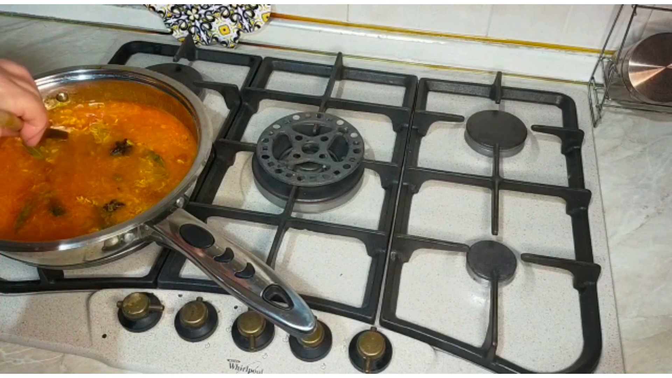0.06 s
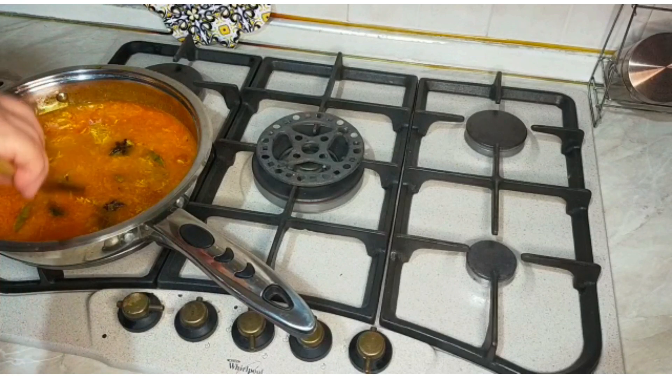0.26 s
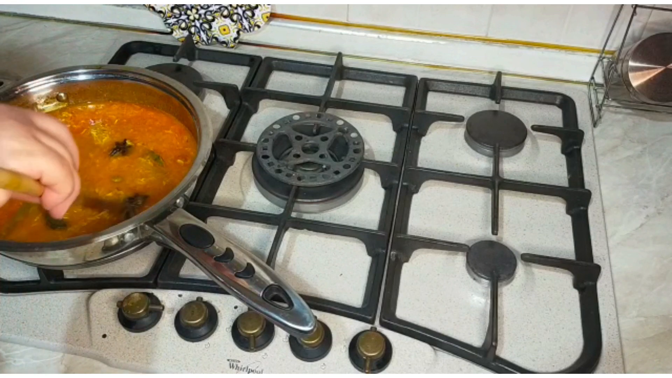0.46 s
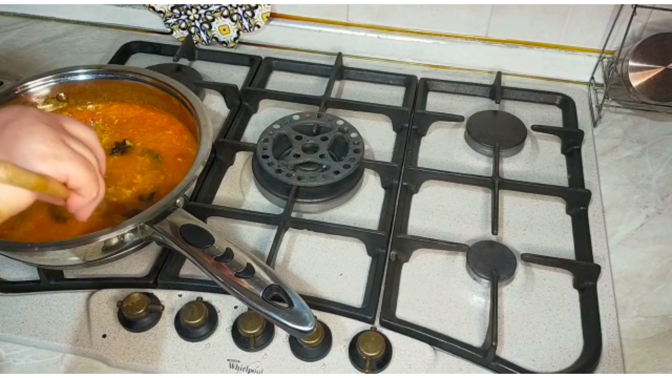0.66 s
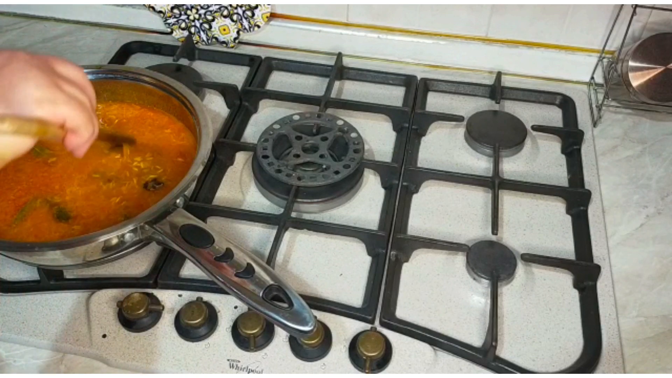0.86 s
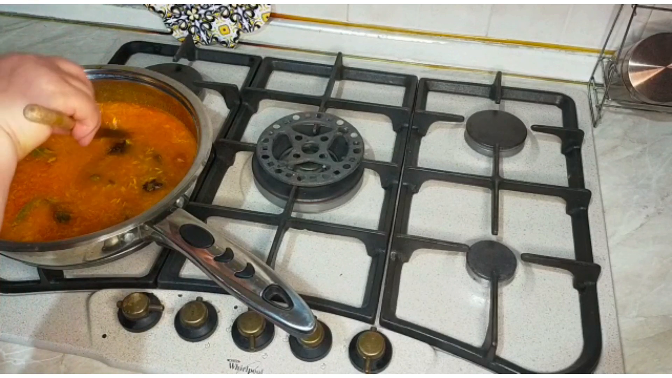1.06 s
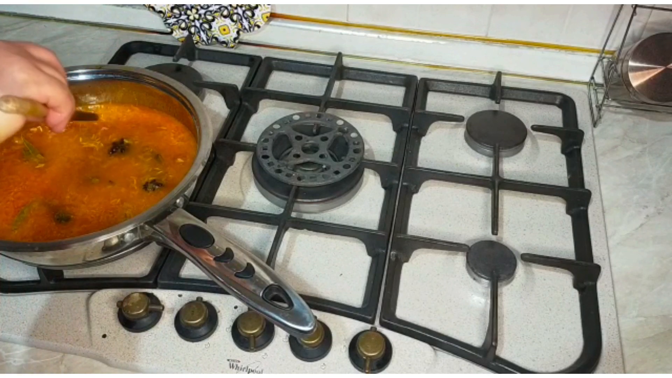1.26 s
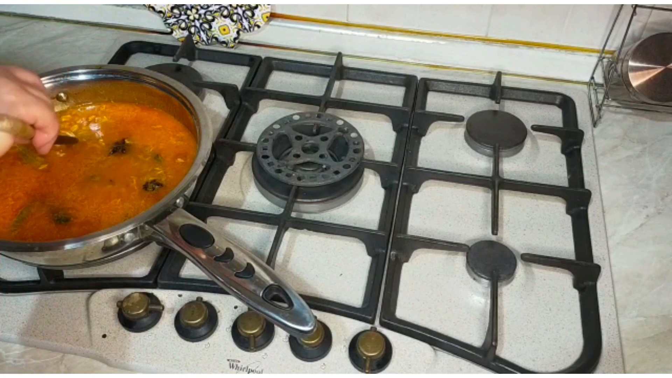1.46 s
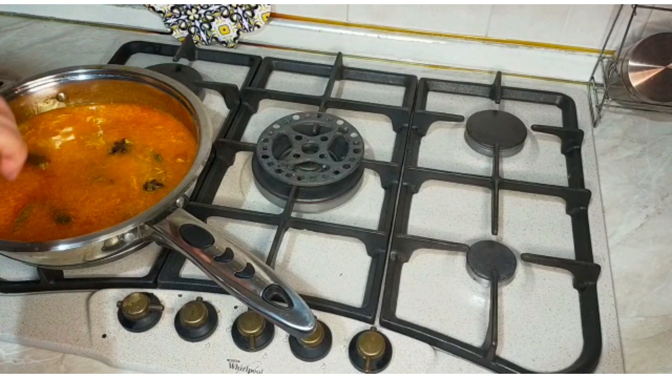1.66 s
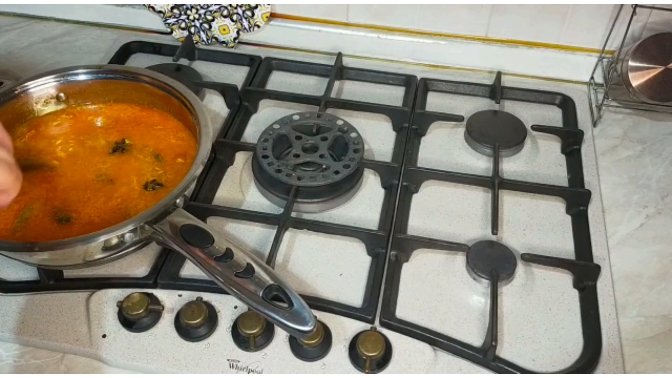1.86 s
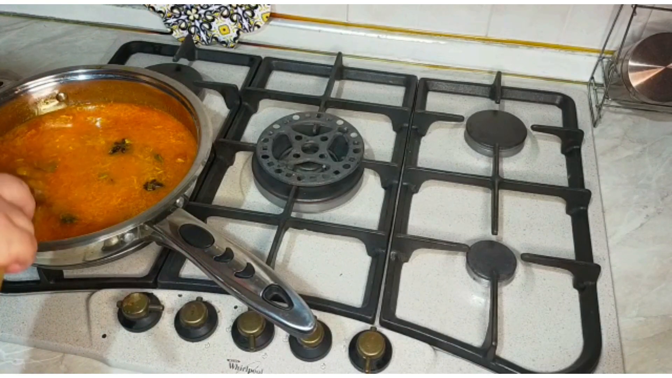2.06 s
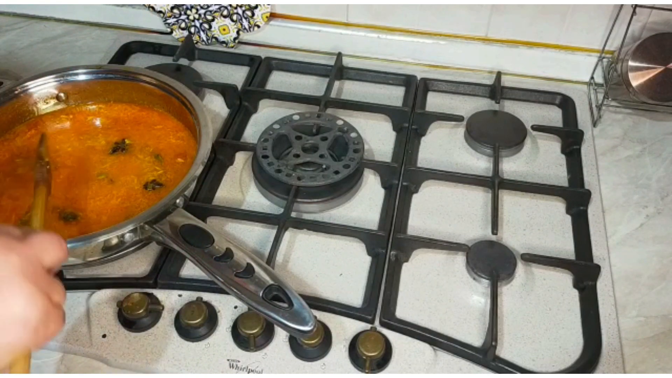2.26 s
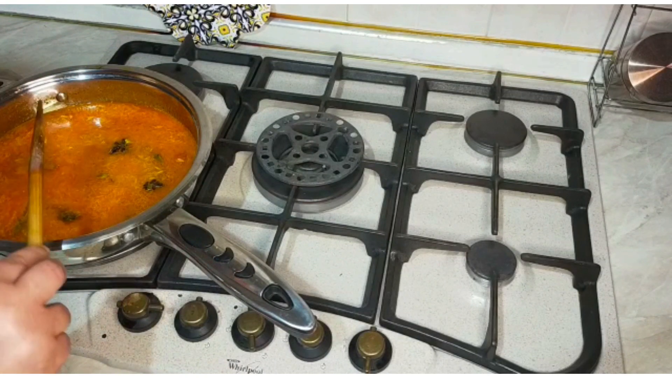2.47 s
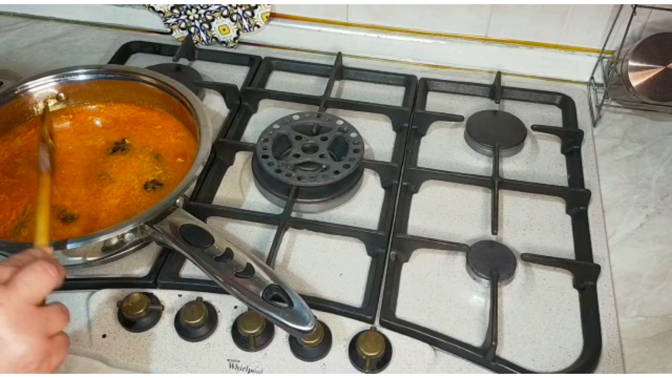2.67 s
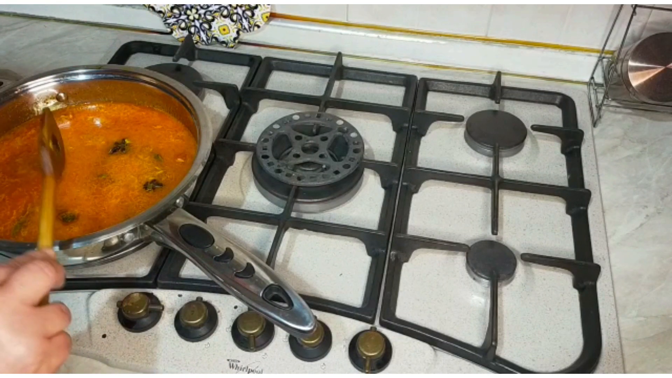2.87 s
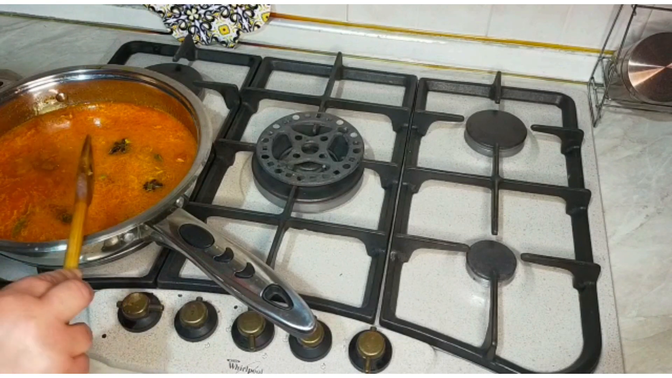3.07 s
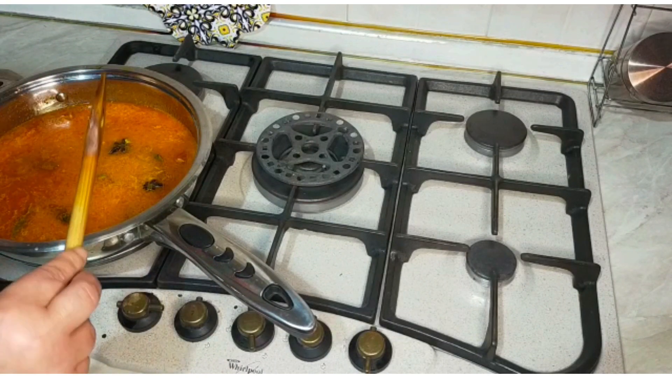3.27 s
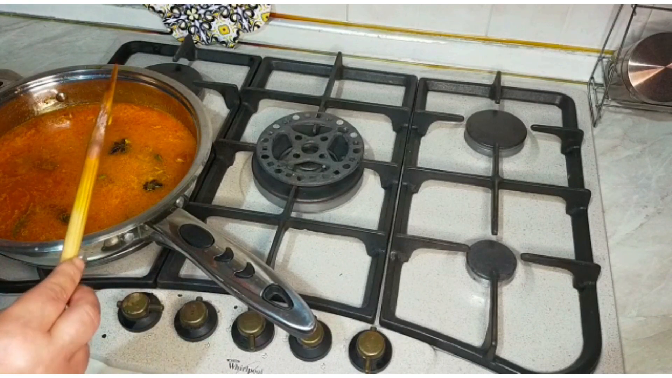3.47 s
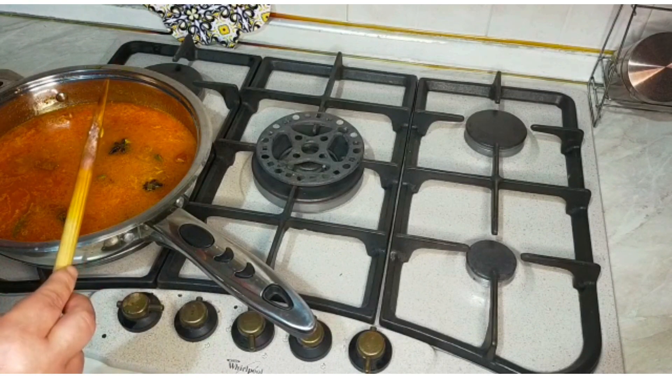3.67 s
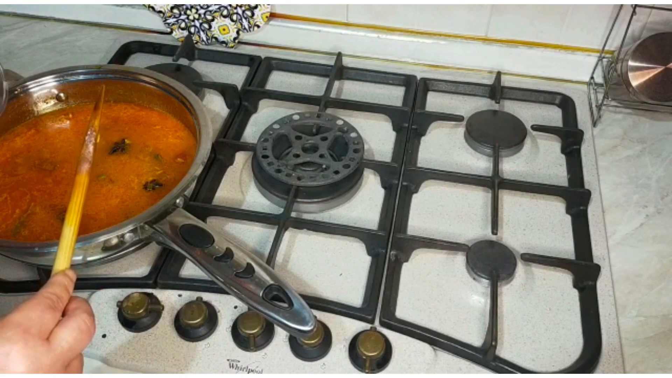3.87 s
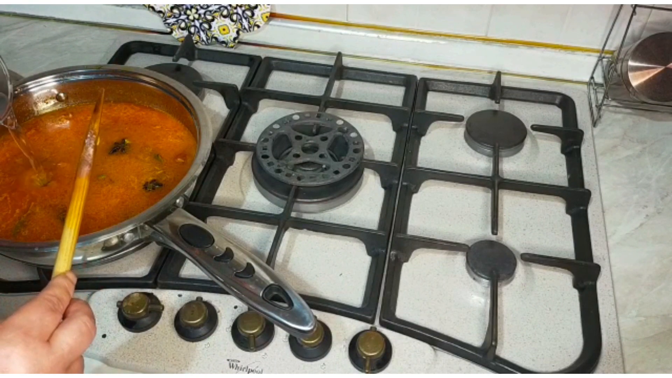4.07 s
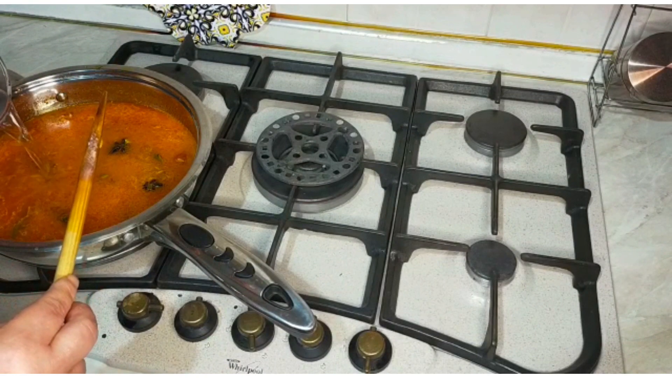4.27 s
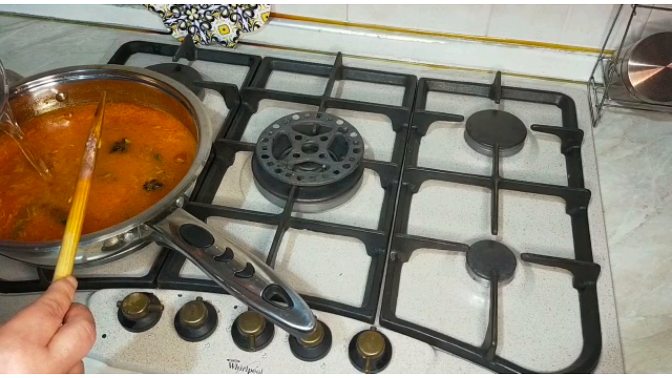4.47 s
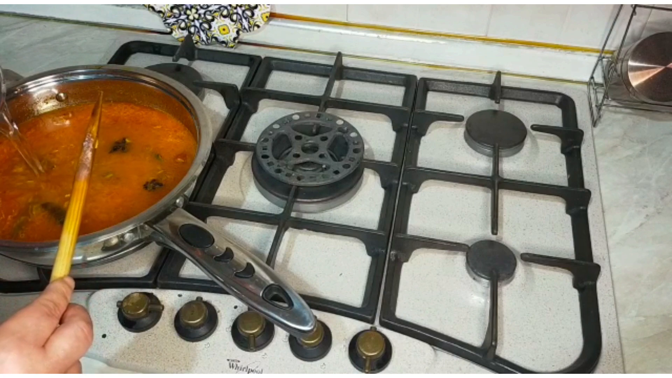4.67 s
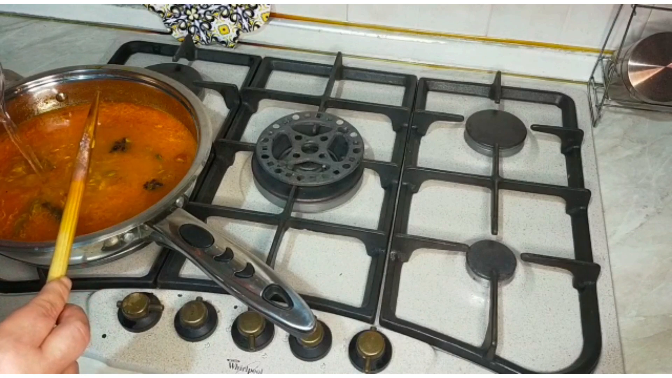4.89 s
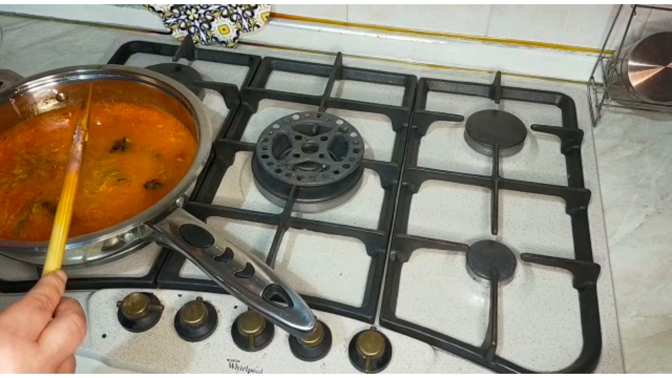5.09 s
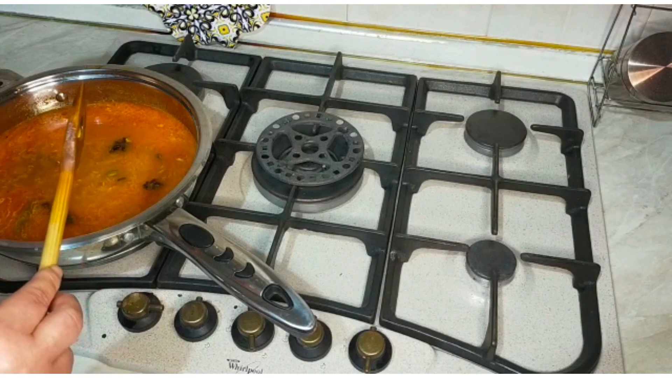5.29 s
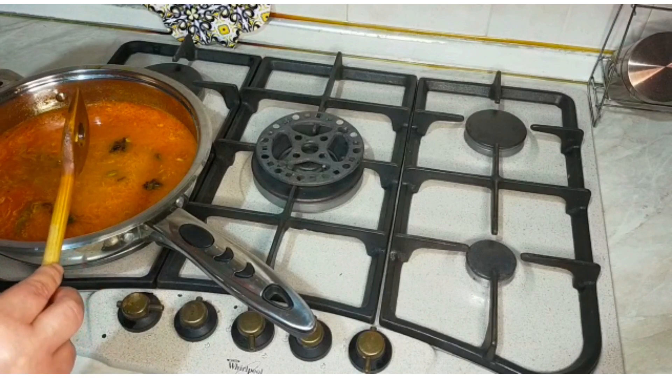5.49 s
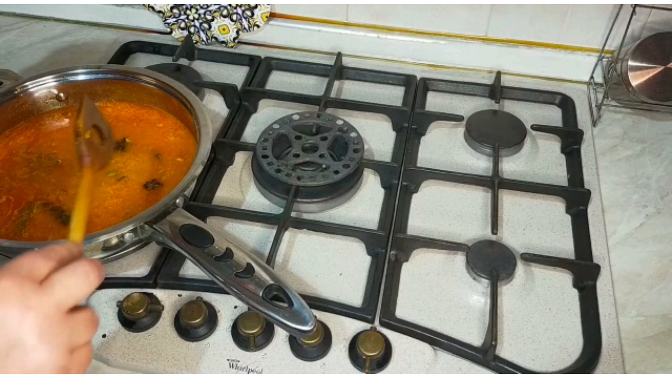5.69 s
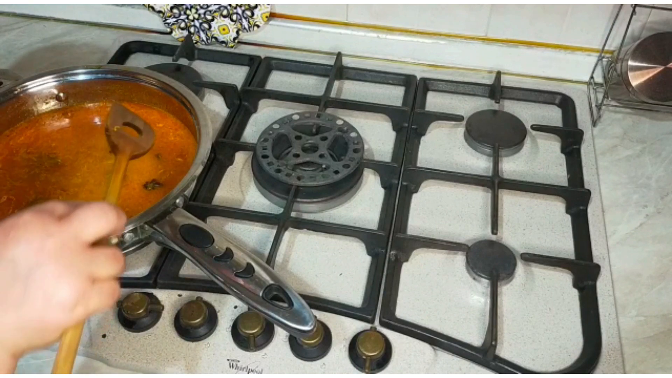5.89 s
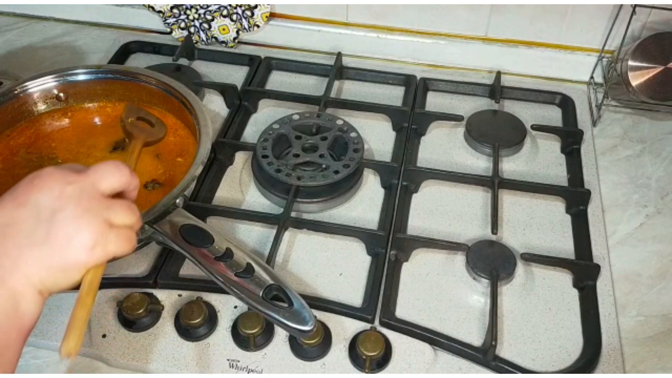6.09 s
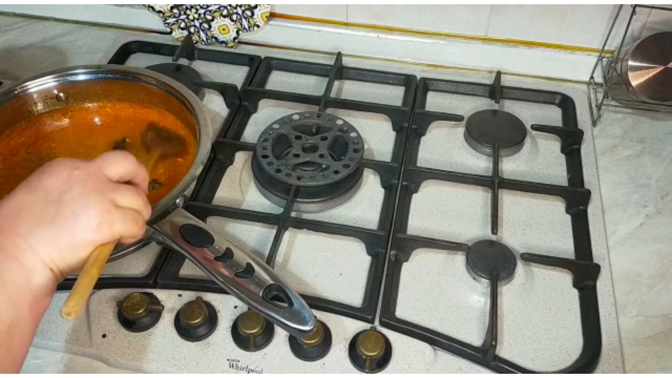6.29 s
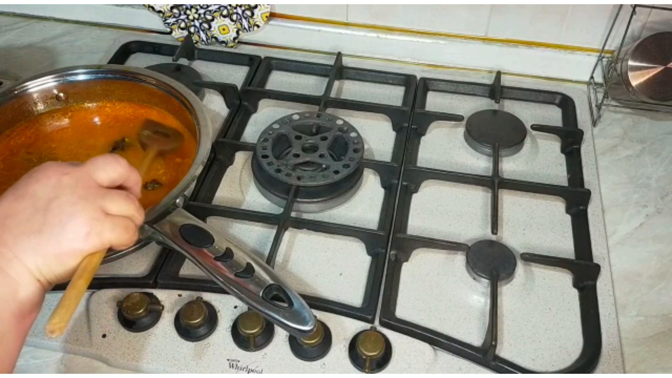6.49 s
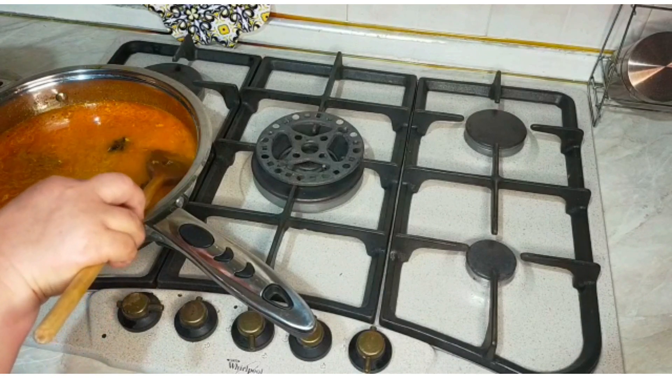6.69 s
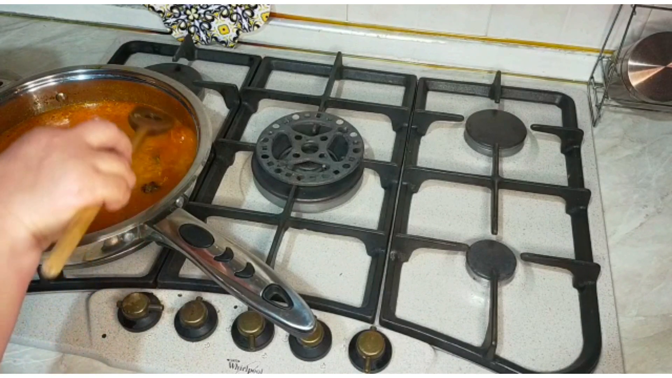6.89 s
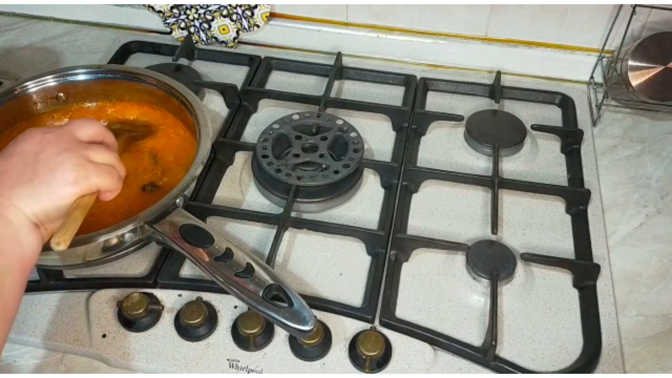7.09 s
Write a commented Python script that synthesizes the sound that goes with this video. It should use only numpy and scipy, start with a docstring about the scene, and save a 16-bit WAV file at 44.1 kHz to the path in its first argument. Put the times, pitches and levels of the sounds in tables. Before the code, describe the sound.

Close mono sound of a pan of sauce simmering on a gas ring in a small hard-surfaced kitchen. After a near-silent start, three quick wood-on-steel blows ring and rattle the pan, and a weaker, darker one follows. The ring dies within about half a second. Low hiss and hum remain; sauce wells up with plops, fizzing spits and a tiny metallic tick, then a faint stirring slosh and closing bubble.

```python
"""A pan of sauce simmers on a hissing gas ring in a tiled kitchen: shaped noise, tiny decaying tones, mains hum.
Near the start the sauce plops and sloshes. The spoon then knocks the rim three times and is laid across it;
noise cracks and clatter, decaying steel modes and a hob boom make each blow.
Unstirred, the sauce wells up, plops, spits and sizzles in damped noise bursts; the resting spoon slips, ticking.
Last, the spoon dips back in: a dull bump and slosh, then one more plop."""
import sys
import numpy as np
from scipy import signal
from scipy.fft import rfft, irfft, next_fast_len
from scipy.io import wavfile

SR = 44100
rng = np.random.default_rng(int(sys.argv[2]) if len(sys.argv) > 2 else 0)


def dump(signal):
    """Clip the signal to [-1, 1] and save it as 16-bit WAV at the path in sys.argv[1]."""
    limited = np.clip(np.atleast_2d(signal).T, -1, 1)
    pcm = np.round(limited * 32767).astype(np.int16)
    wavfile.write(sys.argv[1], SR, pcm)


N = 315182
TIME = np.arange(N) / SR

# crowded short modes of spoon, pan and grate: (frequency [Hz], relative density [dB per Hz])
CLATTER_COLOUR = [(40, -8), (100, 1.5), (190, -9.5), (280, -4), (600, -2), (880, -8.5), (1250, -1.5),
                  (1750, -4.5), (2350, 1.5), (3200, -9), (4700, -16), (6200, -8.5), (7900, -9.5),
                  (9400, -20.5), (12000, -19.5), (14700, -9), (16000, -19)]
# clatter decay in the kitchen: (frequency [Hz], t60 [s])
CLATTER_DECAY = [(60, 0.75), (300, 0.41), (1000, 0.46), (2500, 0.4), (6000, 0.3), (10000, 0.32),
                 (15000, 0.27)]


def from_db(db):
    """Decibels to amplitude gain."""
    return 10 ** (np.asarray(db) / 20)


def rms_one(x):
    """Scale to unit power."""
    return x / np.sqrt(np.mean(x ** 2) + 1e-20)


def at_hz(points, hz):
    """Interpolate a table on a log-frequency axis."""
    table = np.array(points)
    return np.interp(np.log(np.maximum(hz, 1)), np.log(table[:, 0]), table[:, 1])


def fade(t, t60):
    """Exponential decay, 60 dB in t60 seconds."""
    return np.exp(-np.log(1000) * t / t60)


def add(out, start_s, sound):
    """Mix a sound in at start_s."""
    start = max(round(start_s * SR), 0)
    out[start:start + len(sound)] += sound[:N - start]


def noise(gain_at, size):
    """Unit-power noise coloured by a function of frequency."""
    padded = next_fast_len(size)
    hz = np.fft.rfftfreq(padded, 1 / SR)
    spectrum = rfft(rng.standard_normal(padded)) * gain_at(hz)
    return rms_one(irfft(spectrum, padded)[:size])


def band(centre_hz, octaves):
    """Colour of a broad resonance."""
    return lambda hz: 1 / np.sqrt(1 + (2 * np.log2((hz + 1) / centre_hz) / octaves) ** 6)


def tilt(hz, db_per_octave, corner_hz=3800):
    """Treble slope above a corner; a softer contact has a more negative one."""
    return from_db(db_per_octave * np.log2(1 + (hz / corner_hz) ** 2) / 2)


def swell(crest_s, half_s, calm_db, crest_db):
    """Gain rising from a calm level to one rounded crest and sinking back."""
    return from_db(calm_db + (crest_db - calm_db) * np.exp(-((TIME - crest_s) / half_s) ** 2))


def pop(hz, octaves, t60, room_db=-9.0, room_t60=0.39):
    """Damped noise burst with a diffuse echo off the tiles; a very short one feeds the room less."""
    t = TIME[:SR // 2]
    feed = np.sqrt(min(t60 / .04, 1))
    echo = feed * from_db(room_db) * fade(t, room_t60)
    envelope = np.hypot(fade(t, t60), echo)
    return noise(band(hz, octaves), size=len(t)) * envelope


def hum():
    """Steady mains tones and a motor just below one of them; the close pair beats slowly."""
    # (frequency [Hz], level [dB rms])
    hum_tones = [(50, -81.5), (98.25, -80), (100, -77.5)]
    out = np.zeros(N)
    for hz, db in hum_tones:
        out += np.sqrt(2) * from_db(db) * np.sin(2 * np.pi * (hz * TIME + rng.random()))
    return out


def burner(flame_db=-64.5, skirt=2.3):
    """Broad flame rush, plus breathy noise bands where the gas jet whistles in the burner tube."""
    # flame rush: (frequency [Hz], relative density [dB per Hz])
    flame_colour = [(20, -1), (55, -4.5), (125, -6), (200, -5), (300, 1), (550, -7.5), (1000, -12),
                    (1700, -14), (3000, -20), (5700, -31.5), (8500, -21.5), (9800, -15.5), (11000, -19.5),
                    (16000, -12.5)]
    # jet whistles: (centre [Hz], width [Hz], level [dB rms])
    jet_whistles = [(188.3, 19, -75.5), (273.8, 29, -77), (1891, 102, -78.5), (4160, 790, -84),
                    (7467, 570, -65.5), (14560, 500, -69)]
    out = from_db(flame_db) * noise(lambda hz: from_db(at_hz(flame_colour, hz)), size=N)
    for centre, width, db in jet_whistles:
        whistle = noise(lambda hz: (1 + (2 * (hz - centre) / width) ** 2) ** (-skirt / 2), size=N)
        out += from_db(db) * whistle
    return out


def simmer(count=2000, cycles=20, size_range_db=7):
    """Tiny bubbles burst at random, each a short ring at its own pitch; the boil swells once."""
    # (crest time [s], half length [s], calm level [dB], crest level [dB])
    boil_swell = (4.5, 0.2, -87.5, -81.5)
    out, t = np.zeros(N), TIME[:SR // 20]
    for when, pitch, size in rng.random((count, 3)):
        hz = 1300 * 2.7 ** pitch
        ring = np.sin(2 * np.pi * hz * t) * fade(t, cycles / hz)
        add(out, when * TIME[-1], from_db(size_range_db * size) * ring)
    return swell(*boil_swell) * rms_one(out)


def sizzle(per_s=220, grain_t60=0.021, centre_hz=14700, octaves=0.19):
    """Countless small spits: random decaying grains gate a very high noise band, swelling once."""
    # (crest time [s], half length [s], calm level [dB], crest level [dB])
    sizzle_swell = (5.05, 0.2, -77, -67.5)
    births = (rng.random(N) < per_s / SR) * rng.exponential(1, N)
    grains = signal.lfilter([1], [1, -fade(1 / SR, grain_t60)], births + 1e-18)
    hiss = noise(band(centre_hz, octaves), size=N)
    return swell(*sizzle_swell) * rms_one(grains * hiss)


def sauce(bubble_cycles=44, bubble_octaves=0.26, slosh_t60=0.39):
    """Big bubbles: the skin snaps, the hollow rings at its pitch; moving sauce sloshes softly."""
    # big bubbles: (time [s], level [dB], pitch [Hz])
    bubble_bursts = [(.156, -66, 1400), (3.906, -56, 1450), (4.531, -64, 2100), (4.749, -59, 4330),
                     (4.806, -60, 1710), (4.896, -59, 6000), (4.9042, -56.5, 1800), (6.8956, -52, 1750)]
    # stirred or welling sauce: (time [s], level [dB], pitch [Hz], width [octaves])
    slosh_bursts = [(.169, -62, 640, 0.64), (4.41, -72, 2000, 0.82), (4.83, -66, 1490, 1.7),
                    (4.905, -65, 810, 0.6), (6.469, -66, 600, 2.3)]
    snap_db, snap_hz, snap_octaves, snap_t60 = -3, 4000, 2.5, 0.018  # level relative to the ring
    out = np.zeros(N)
    for s, db, hz in bubble_bursts:
        ring = pop(hz, bubble_octaves, bubble_cycles / hz)
        snap = from_db(snap_db) * pop(snap_hz, snap_octaves, snap_t60)
        add(out, s, from_db(db) * (ring + snap))
    for s, db, hz, octaves in slosh_bursts:
        add(out, s, from_db(db) * pop(hz, octaves, slosh_t60))
    return out


def spits(fizz_hz=14800, fizz_octaves=0.15, click_db=-9, click_hz=11000, click_octaves=1.6):
    """The loudest droplets flash to steam on hot steel: a broad click and a very high fizz."""
    # (time [s], level [dB])
    droplets = [(4.7022, -51.5), (4.8536, -41), (4.865, -45.5), (4.9437, -55), (5.27, -50)]
    out = np.zeros(N)
    for s, db in droplets:
        fizz = pop(fizz_hz, fizz_octaves, t60=.022, room_db=-12, room_t60=.2)
        click = from_db(click_db) * pop(click_hz, click_octaves, t60=.016)
        add(out, s, from_db(db) * (fizz + click))
    return out


def spoon_touches(tick_hz=3440, tick_octaves=0.71, tick_t60=0.019,
                  bump_hz=108, bump_octaves=1.4, bump_t60=0.23):
    """The resting spoon slips on the rim, a ringing tick; later it nudges the pan bottom, a dull bump."""
    # tick ring: (frequency [Hz], level relative to tick [dB], t60 [s])
    tick_modes = [(2540, -15.5, 0.32), (3262, -18, .25), (3898, -12, 0.17)]
    tick_s, tick_db = 4.9985, -44
    bump_s, bump_db = 6.502, -60
    out, t = np.zeros(N), TIME[:SR // 2]
    ring = sum(from_db(db) * np.sin(2 * np.pi * hz * t) * fade(t, t60) for hz, db, t60 in tick_modes)
    tick = pop(tick_hz, tick_octaves, tick_t60)
    add(out, tick_s, from_db(tick_db) * (tick + ring))
    add(out, bump_s, from_db(bump_db) * pop(bump_hz, bump_octaves, bump_t60))
    return out


def clatter(t, slope, swell_cycles=2.9):
    """Crowded modes and their reflections: lows swell later, each band has its own decay."""
    colour = lambda hz: from_db(at_hz(CLATTER_COLOUR, hz)) * tilt(hz, slope)
    spectrum = rfft(noise(colour, size=len(t)))
    bins = np.fft.rfftfreq(len(t), 1 / SR)
    centres = [hz for hz, t60 in CLATTER_DECAY]
    out = 0
    # identity rows become overlapping triangular bands
    for (hz, t60), share in zip(CLATTER_DECAY, np.eye(len(centres))):
        part = irfft(spectrum * at_hz(list(zip(centres, share)), bins), len(t))
        out = out + part * fade(t, t60) * (1 - np.exp(-t * hz / swell_cycles))
    return out


def pan_ring(t, slope, ring_db, boom_db, hob_hz=200, swell_cycles=0.63):
    """The hob booms; each steel mode is three close partials that start in phase, then beat."""
    # pan and hob: (frequency [Hz], relative level [dB], t60 [s])
    pan_modes = [(60, -44.7, 0.85), (103.5, -45.9, 0.8), (113, -48.8, 0.7), (264, -51, 0.8),
                 (455, -46, 0.4), (672, -44.2, 0.6), (783, -49.8, 0.7), (1147, -39.8, 0.5),
                 (1514, -44.7, 0.45), (1944, -40.8, 0.5), (2020, -43.0, 0.62), (2105, -45.5, 0.4),
                 (2214, -33, 0.54), (2414, -44.4, 0.55), (2565, -44.8, 0.5), (2670, -42, 0.66),
                 (2697, -47.6, 0.75), (3023, -46.1, 0.55), (3232, -47.9, 0.6), (3768, -51.0, 0.5),
                 (4097, -50, 0.5), (4401, -50.6, 0.5), (4953, -53, 0.45), (5392, -46.9, 0.42),
                 (5884, -50, 0.54), (6019, -44.6, 0.42), (6428, -46.8, 0.5), (6973, -48, 0.35),
                 (7762, -44, 0.3), (8095, -47.7, 0.32), (12380, -50.8, 0.25), (13010, -43.8, 0.26),
                 (13685, -42.6, 0.27), (14350, -40.5, 0.27), (14945, -44.0, 0.27)]
    out = 0
    for hz, db, t60 in pan_modes:
        if hz < hob_hz:
            swing = from_db(boom_db) * np.sin(2 * np.pi * hz * t)
        else:
            split_hz = hz * (1 + .0035 * np.array([0, -1, 1]) * rng.uniform(.4, 1.8, 3))
            partials = np.sin(2 * np.pi * (np.outer(split_hz, t) + rng.random()))
            swing = from_db(ring_db) * np.array([.85, .4, .4]) @ partials
        radiation = tilt(hz, 2.5, corner_hz=5000)
        envelope = fade(t, t60) * (1 - np.exp(-t * hz / swell_cycles))
        out = out + from_db(db) * radiation * tilt(hz, slope) * swing * envelope
    return out


def overtones(count=130, spread_db=2):
    """Many weak higher steel modes, unevenly spaced, shared by every blow: (Hz, relative dB)."""
    hz = np.geomspace(2600, 12500, count) * (1 + .005 * rng.standard_normal(count))
    # density times the spacing, which grows with frequency
    db = at_hz(CLATTER_COLOUR, hz) + 10 * np.log10(hz)
    return hz, db + spread_db * rng.standard_normal(count)


def shimmer(t, slope, modes):
    """The weak modes ring together as a metallic sheen."""
    hz, db = modes
    gain = from_db(db + 2 * rng.standard_normal(len(hz)))
    gain = gain / np.sqrt(np.sum(gain ** 2) / 2)  # unit power before the tilt
    gain = gain * tilt(hz, slope)
    swings = np.sin(2 * np.pi * (np.outer(hz, t) + rng.random((len(hz), 1))))
    return gain @ (swings * fade(t, at_hz(CLATTER_DECAY, hz)[:, None]))


def knocks(clatter_db=-29, crack_db=-25, ring_db=-1.0, sheen_db=-33, crack_t60=0.032,
           spoon_hz=3100, spoon_octaves=0.39, spoon_t60=0.27):
    """Spoon on rim: a crack, the jolted pan's clatter and ring, and the spoon's note echoing in the room."""
    # (time [s], level [dB], treble tilt [dB per octave], crack [dB], steel ring [dB], hob boom [dB],
    #  spoon note [dB]); the parts are relative to the level
    rim_blows = [(2.3589, 0, -1.5, 0.5, -2.5, 2, -49), (2.5699, -2.5, -1.7, -3, 1, 3, -38.5),
                 (2.7375, .5, -2, 1.5, 0.5, -1.5, -40), (2.8894, -10, -7, -6.5, 1.5, 3, -30.5)]
    # first contact of wood and steel: (frequency [Hz], relative density [dB per Hz])
    crack_colour = [(300, -96), (1200, -4), (2400, 8), (4700, 6), (6200, -16), (7700, 20), (9500, -7),
                    (15000, 11)]
    out, t, modes = np.zeros(N), TIME[:SR], overtones()
    for s, db, slope, hard_db, free_db, boom_db, spoon_db in rim_blows:
        crack = noise(lambda hz: from_db(at_hz(crack_colour, hz)) * tilt(hz, slope), size=len(t))
        crack = crack * fade(t, crack_t60)
        spoon = noise(band(spoon_hz, spoon_octaves), size=len(t)) * fade(t, spoon_t60)
        wood = from_db(crack_db + hard_db) * crack + from_db(spoon_db) * spoon
        ring = from_db(ring_db) * pan_ring(t, slope, free_db, boom_db)
        pan = from_db(clatter_db) * clatter(t, slope) + ring
        add(out, s, from_db(db) * (wood + pan))
        add(out, s, from_db(db + sheen_db) * shimmer(t[:SR // 2], slope, modes))
    return out


def scene():
    """Sum of all sources, one channel."""
    background = hum() + burner() + simmer() + sizzle()
    return (background + sauce() + spits() + spoon_touches() + knocks())[None]


def record(dry, cutoff_hz=15900):
    """Steep elliptic low-pass cuts the top."""
    lowpass = signal.ellip(12, .1, 80, cutoff_hz, fs=SR, output="sos")  # ripple, stopband [dB]
    return signal.sosfilt(lowpass, dry)


dry = scene()
out = record(dry)
dump(out)
```